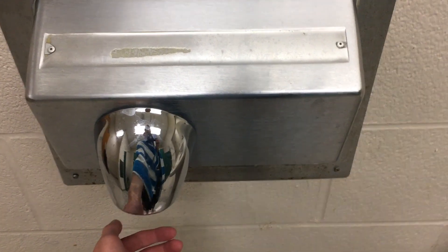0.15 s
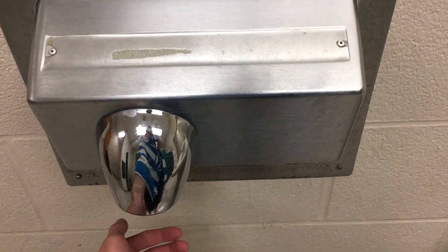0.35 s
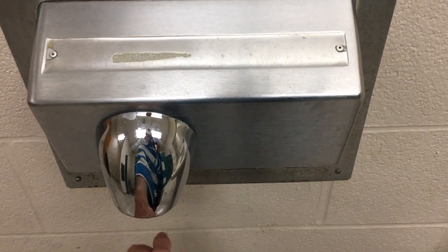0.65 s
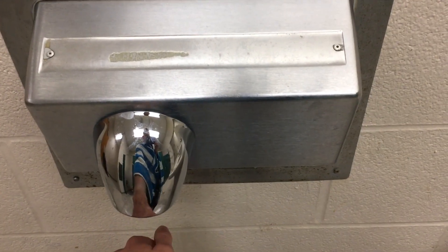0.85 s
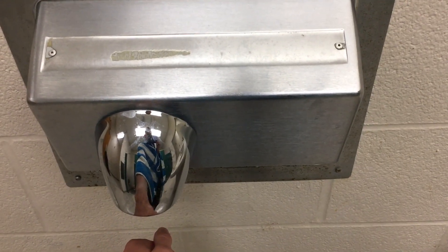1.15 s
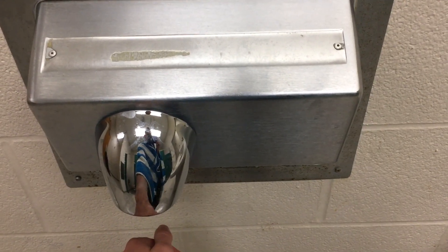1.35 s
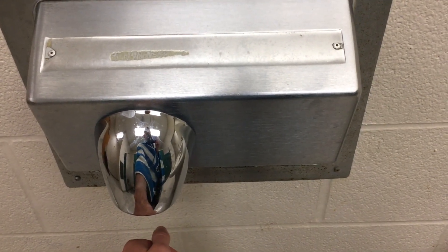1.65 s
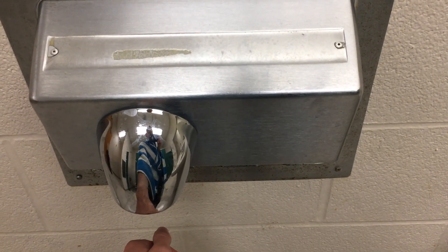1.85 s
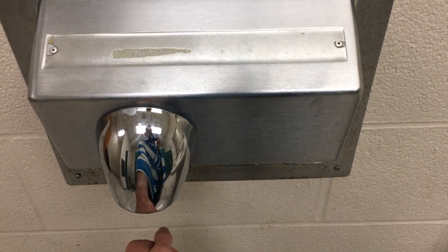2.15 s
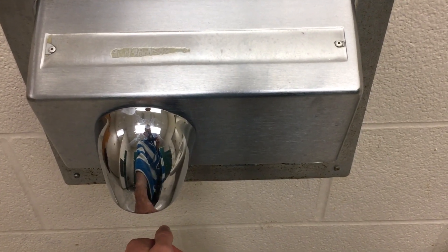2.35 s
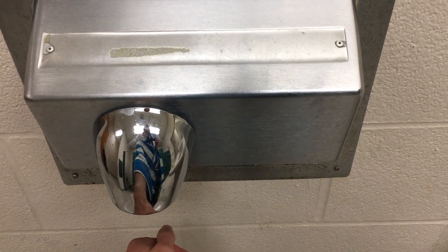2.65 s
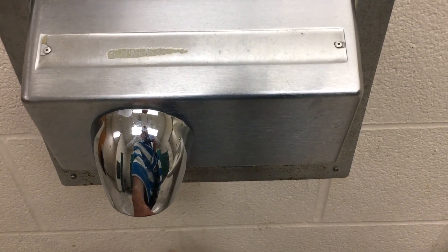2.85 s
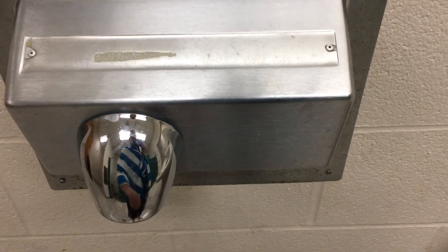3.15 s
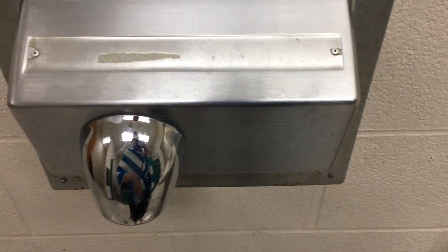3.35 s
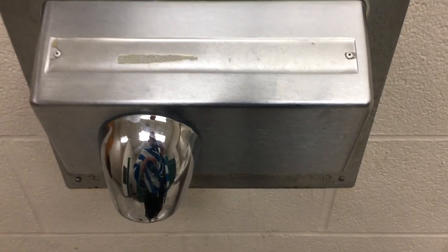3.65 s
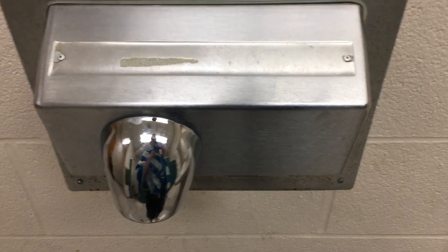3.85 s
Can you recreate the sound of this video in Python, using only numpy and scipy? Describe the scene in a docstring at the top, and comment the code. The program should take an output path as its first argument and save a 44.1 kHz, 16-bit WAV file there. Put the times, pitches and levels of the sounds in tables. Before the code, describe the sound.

Close to the microphone, a hand dryer blasts air, hissing briefly over a hand; it clicks off, the whine stops, and the airflow fades with a descending whir in a hard-walled, reverberant washroom.

```python
"""A steel wall-mounted hand dryer runs in a tiled washroom, heard from close by, over steady ventilation noise.
Air (coloured noise) rumbles and rushes through the housing and hisses over a hand, soon drawn away.
A relay clicks (short noise bursts) and cuts the power: the motor's whine and hum (sines) stop.
The fan coasts down: its air noise fades and its blade tone (a gliding sine) sinks towards the ventilation.
Late in the coasting, cloth brushes faintly as the arm is lowered."""
import sys
import numpy as np
from scipy import signal
from scipy.fft import rfft, irfft
from scipy.io import wavfile
from scipy.ndimage import uniform_filter1d

SR = 44100
rng = np.random.default_rng(int(sys.argv[2]) if len(sys.argv) > 2 else 0)


def file_out(sig):
    """Save sig as 16-bit WAV at sys.argv[1]."""
    # one column per channel
    cols = np.atleast_2d(sig).T
    # limit, then scale
    lim = np.clip(cols, -1, 1)
    pcm = np.round(lim * 32767).astype(np.int16)
    wavfile.write(sys.argv[1], SR, pcm)


N = 176400  # samples: 4 s

POWER_OFF_S = 0.9123  # the relay opens


def undb(db):
    """Turn decibels into a plain gain."""
    return 10 ** (np.asarray(db) / 20)


def level(x, db):
    """Set the average (rms) level in dB."""
    return x * undb(db) / np.sqrt(np.mean(x ** 2))


def noise(points, peaks=()):
    """Noise of rms 1, coloured by (frequency, level) points and lifted or dipped at the given peaks."""
    f = np.maximum(np.arange(N // 2 + 1) * SR / N, 1)
    hz, db = np.array(points, float).T
    shape = np.interp(np.log(f), np.log(hz), db)
    # beyond both ends of the table the level falls by 60 dB per decade
    shape -= 60 * np.maximum(np.log10(hz[0] / f), 0)
    shape -= 60 * np.maximum(np.log10(f / hz[-1]), 0)
    for centre, width, lift in peaks:
        shape += lift / (1 + (2 * (f - centre) / width) ** 2)
    white = rfft(rng.standard_normal(N))
    return level(irfft(white * undb(shape), N), 0)


def walk(rate):
    """A smooth random wander of rms 1, from `rate` random values a second."""
    k = int(SR / rate)
    steps = np.repeat(rng.standard_normal(N // k + 1), k)
    smooth = uniform_filter1d(uniform_filter1d(steps, k), k)
    return level(smooth[:N], 0)


def tone(hz, db):
    """A sine that follows a pitch curve, at an rms level."""
    turns = np.cumsum(hz) / SR + rng.random()
    return np.sqrt(2) * undb(db) * np.sin(2 * np.pi * turns)


ECHO_T60_S = 0.69  # time for the echo to fall by 60 dB


def tiles(x, db):
    """Hard walls add a dense echo above the bass, which ripples the spectrum and smears gliding tones."""
    age = np.arange(N) / SR
    echo = noise([(700, 0), (3000, 0), (16000, -6)]) * undb(-60 * age / ECHO_T60_S)
    wet = signal.fftconvolve(x, echo / np.sqrt(np.sum(echo ** 2)))[:N]
    return x + undb(db) * wet


# Colour of the washroom's ventilation noise: (frequency [Hz], level [dB])
VENT_COLOUR = [(22, -42), (33, -12), (43, 5.5), (110, -4), (240, -6), (420, -21), (520, -20.5), (1400, -29),
               (2800, -38), (5500, -34.5), (9000, -46), (10500, -46.5), (15700, -51)]
# Its low drones: (frequency [Hz], width [Hz], lift [dB])
VENT_DRONES = [(90.9, 7.4, 9.4), (133.7, 8.5, 13.6), (245, 16, 9.6)]
VENT_DB = -47


def ventilation():
    """Steady duct noise that drones in a few low room modes."""
    return undb(VENT_DB) * noise(VENT_COLOUR, VENT_DRONES)


# Five bands of air noise in the blower and duct, from low to high.
# Colour of each: (frequency [Hz], level [dB])
BOOM_COLOUR = [(25, -30), (34, -19), (43, -3), (58, 2), (100, 3.5), (140, -1), (200, 0), (300, -38)]
RUMBLE_COLOUR = [(60, -27), (100, -8), (150, -3.5), (215, -0.5), (270, -1), (340, 0.5), (410, -3),
                 (448, -3.5), (470, -15.5), (560, -35), (900, -28)]
RUSH_COLOUR = [(350, -24), (520, -6.5), (700, -5.5), (900, -4), (1100, -4.5), (1250, -6.5), (1400, 1),
               (1520, -4), (1620, -9.5), (1750, -0.5), (1900, -0.5), (2010, -9.5), (2350, -13), (2550, -17),
               (3200, -36)]
HISS_COLOUR = [(1500, -9.5), (2600, -2.5), (2900, -2), (3250, 5), (3600, 0), (4000, 0.5), (4800, -8),
               (5700, -6.5), (6900, -5.5), (7800, -10), (8500, -9), (9300, -8.5), (10300, -18),
               (12000, -30), (16000, -44)]
SIZZLE_COLOUR = [(5000, -30), (9000, 9), (10400, -3), (11300, 4.5), (12500, 0), (14000, -2.5), (15700, -5)]
# Resonances of housing and room: (frequency [Hz], width [Hz], lift or, if negative, dip [dB])
AIR_RESONANCES = [(45.6, 6.7, 7), (69.6, 7, 6), (96, 7, 7), (133.5, 10, 5.5), (225, 30, 5),
                  (307.3, 10, 1.5), (402.7, 12.4, 6), (433, 10, 1.5), (657, 90, 2), (784, 36, 0.5),
                  (892, 65, 6.5), (1026, 52, 10), (1148, 38, 5.5), (1349, 44, 6.5), (1470, 23, -0.5),
                  (1500, 98, 7), (1690, 35, 4), (1760, 35, 3), (1850, 30, -0.5), (2090, 31, 6),
                  (2238, 105, 7), (2434, 53, 9), (3090, 60, 2.5), (3320, 71, -4.5), (3872, 40, 7.5),
                  (3980, 56, 2), (4480, 90, 5), (5610, 190, 3.5)]
# Dry level at full speed [dB]; amplitude follows fan speed ** power
BOOM_DB, BOOM_POWER = -43.5, 2
RUMBLE_DB, RUMBLE_POWER = -31.5, 1.98
RUSH_DB, RUSH_POWER = -35, 2.91
HISS_DB, HISS_POWER = -43, 3.23
SIZZLE_DB, SIZZLE_POWER = -52.5, 4.6


def air(speed):
    """Turbulence in the resonant housing; from rumble up, higher bands die faster as the fan slows."""
    layers = [
        (BOOM_COLOUR, BOOM_DB, BOOM_POWER),
        (RUMBLE_COLOUR, RUMBLE_DB, RUMBLE_POWER),
        (RUSH_COLOUR, RUSH_DB, RUSH_POWER),
        (HISS_COLOUR, HISS_DB, HISS_POWER),
        (SIZZLE_COLOUR, SIZZLE_DB, SIZZLE_POWER),
    ]
    return sum(noise(colour, AIR_RESONANCES) * undb(db) * speed ** power for colour, db, power in layers)


# Colour of the air splashing off the hand: (frequency [Hz], level [dB])
SPLASH_COLOUR = [(3000, -22), (6300, -12), (7050, 3.5), (7600, -10), (9000, -4.5), (10200, -14),
                 (14000, -13), (16000, -22)]
SPLASH_DB, SPLASH_WAVER_DB = -50.5, 1.5  # dry level and its random waver
HAND_LEAVES_S, HAND_MOVE_S = 0.62, 0.094  # middle and length of the fade


def hand_splash(t):
    """Air hisses off the hand in unsteady noise that fades out as the hand is drawn away."""
    hand = np.clip(0.5 + (HAND_LEAVES_S - t) / HAND_MOVE_S, 0, 1)
    return hand * noise(SPLASH_COLOUR) * undb(SPLASH_DB + SPLASH_WAVER_DB * walk(39))


SHAFT_HZ, SPEED_WOBBLE = 57.2, 0.00039  # turns per second at full speed, wobble as a fraction
SLOTS, BLADES = 34, 33  # whine and blade cycles per turn
WHINE_DB, WHINE_WAVER_DB, WHINE_STOP_S = -39, 1, 0.013  # the last: time to fall to 37 %
# Before the housing's colour, the dip under power and the echo
BLADE_DB, BLADE_WAVER_DB = -44.5, 2.0
# Motor hum under power: (multiple of the shaft rate [-], level [dB])
HUM_TONES = [(3, -48), (6, -48.5), (20, -50), (30, -47.5)]
# How the housing passes the sinking blade tone: (frequency [Hz], level [dB])
BLADE_COLOUR = [(700, -36), (830, -29), (900, -17), (970, -20), (1060, -15), (1230, -18), (1340, -9),
                (1400, -9), (1470, -4), (1580, -11), (1660, -1), (1790, 2), (1890, -2)]


def motor(coast, speed):
    """Slot whine and hum last while the power is on; the blade tone stands out and echoes as the fan coasts."""
    shaft = SHAFT_HZ * speed * (1 + SPEED_WOBBLE * walk(11.9))
    powered = np.exp(-coast / WHINE_STOP_S)
    whine = tone(SLOTS * shaft, WHINE_DB + WHINE_WAVER_DB * walk(11.2))
    hum = sum(tone(multiple * shaft, db + 2 * walk(7.7)) for multiple, db in HUM_TONES)
    blade_hz = BLADES * shaft
    housing_db = np.interp(blade_hz, *np.array(BLADE_COLOUR).T)
    blades = tone(blade_hz, BLADE_DB + housing_db + BLADE_WAVER_DB * walk(16))
    blades = blades * undb(-12 * powered)  # 12 dB weaker under power
    return powered * (whine + hum) + tiles(blades, -5)  # echo level in dB


# Relay armature, blow and bounces: (time after opening [s], level before the ring's shape [dB])
RELAY_BLOWS = [(0.0005, -34.5), (0.0065, -34.5), (0.0095, -39), (0.0145, -43), (0.022, -45)]
# Colour of the click: (frequency [Hz], level [dB])
RELAY_COLOUR = [(1500, -16), (3200, 0), (5500, 2.5), (7500, 3), (9500, -7), (11000, -3), (12100, 3),
                (13200, -7), (14400, -1), (16000, -9)]
RELAY_DECAY_S, RELAY_TAIL_S, RELAY_TAIL_DB = 0.0045, 0.03, -15.5  # short ring, longer weak tail


def relay(t):
    """The armature snaps back and bounces; the steel case rings briefly, as fading bursts of noise."""
    out = np.zeros(N)
    for delay, db in RELAY_BLOWS:
        age = t - POWER_OFF_S - delay
        since = np.maximum(age, 0)
        ring = np.exp(-since / RELAY_DECAY_S)
        ring += undb(RELAY_TAIL_DB) * np.exp(-since / RELAY_TAIL_S)
        out += (age > 0) * ring * undb(db) * noise(RELAY_COLOUR)
    return out


# Colour of the brushing sleeve: (frequency [Hz], level [dB])
CLOTH_COLOUR = [(3000, 0), (6000, 0), (10000, -6), (15500, -8)]
CLOTH_DB, CLOTH_S, CLOTH_WIDTH_S = -73, 3.5, 0.06  # level at the loudest moment, its time, swell width


def rustle(t):
    """A faint brush of cloth as the arm is lowered: noise that swells and fades."""
    swell = np.exp(-((t - CLOTH_S) / CLOTH_WIDTH_S) ** 2)
    return noise(CLOTH_COLOUR) * undb(CLOTH_DB) * swell


DRAG_PER_S, FRICTION_PER_S2 = 0.45, 0.03  # how strongly the coasting fan is slowed


def scene():
    """Dryer and room, the same in both ears; after power-off the fan slows by drag and friction."""
    t = np.arange(N) / SR
    coast = np.maximum(t - POWER_OFF_S, 0)  # seconds without power
    speed = 1 / (1 + DRAG_PER_S * coast + FRICTION_PER_S2 * coast ** 2)  # 1 = full speed
    airflow = tiles(air(speed) + hand_splash(t), -7.5)  # echo level in dB
    mono = ventilation() + airflow + motor(coast, speed) + relay(t) + rustle(t)
    return np.array([mono, mono])


def record(dry):
    """Cut the top steeply, above 15720 Hz."""
    top_cut = signal.ellip(12, 0.1, 80, 15720, fs=SR, output="sos")
    return signal.sosfilt(top_cut, dry)


dry = scene()
out = record(dry)
file_out(out)
```